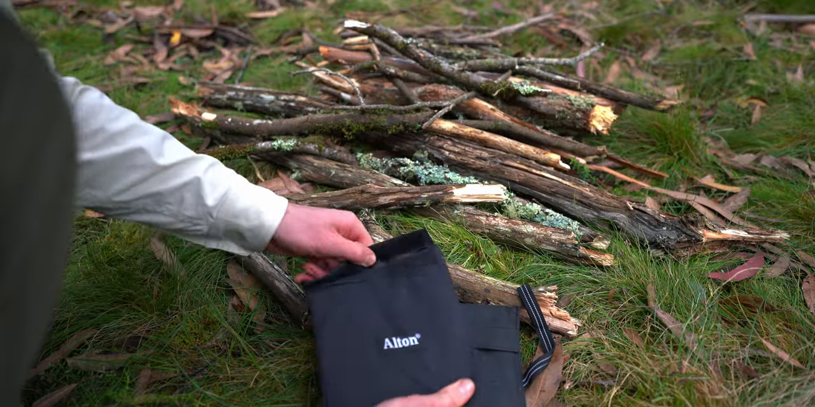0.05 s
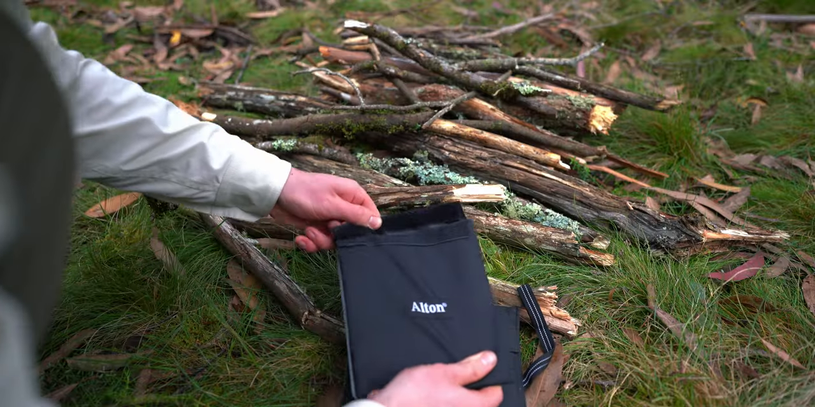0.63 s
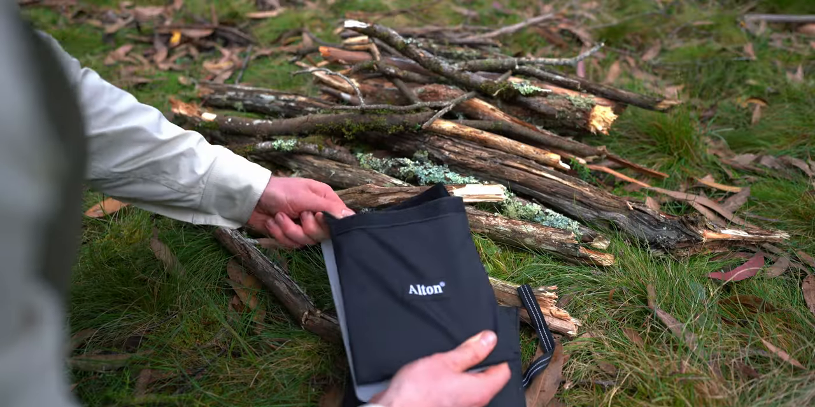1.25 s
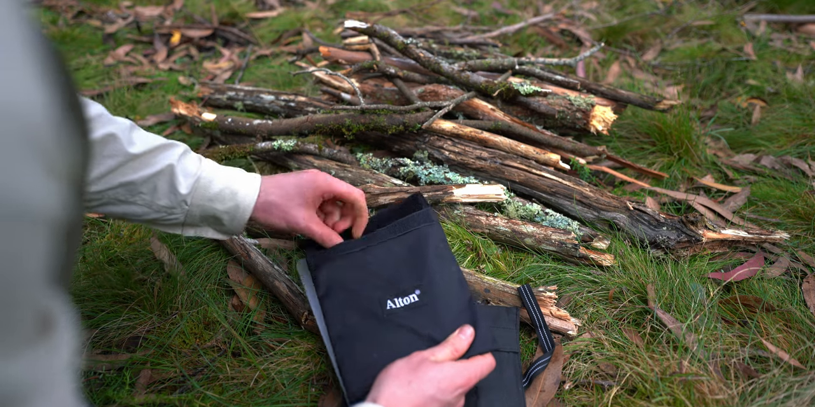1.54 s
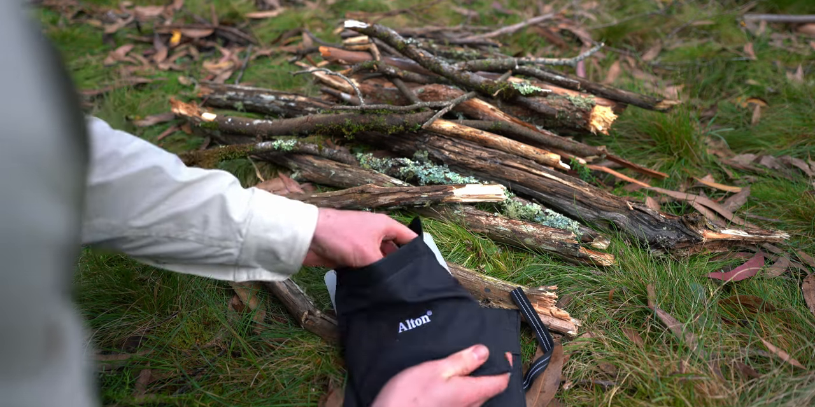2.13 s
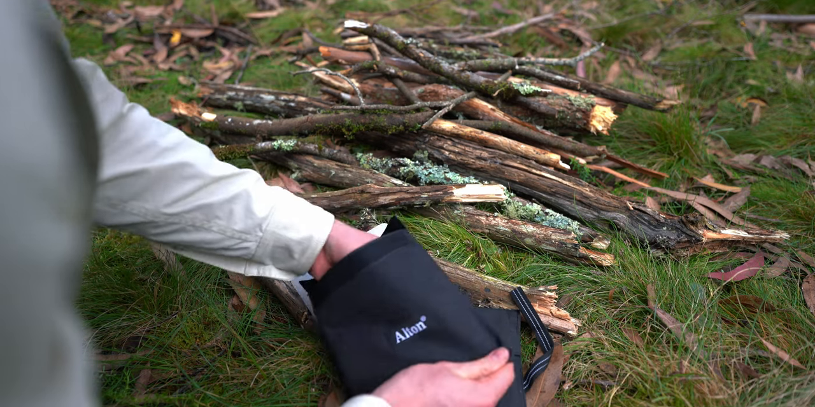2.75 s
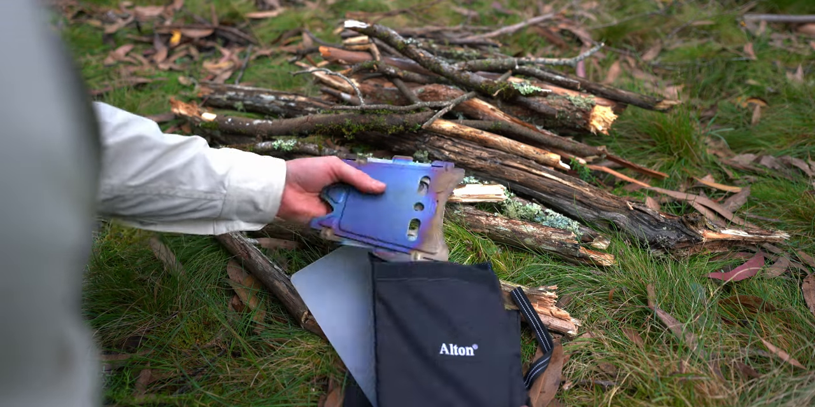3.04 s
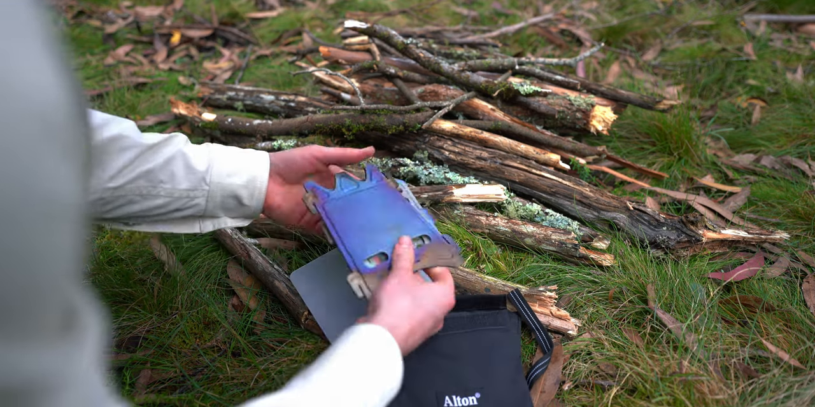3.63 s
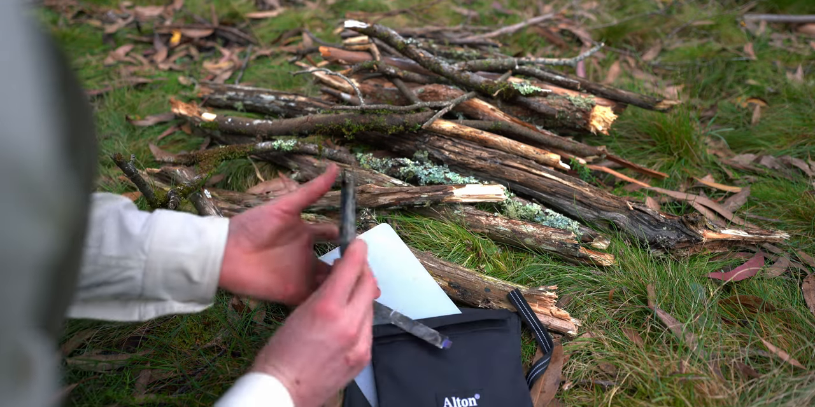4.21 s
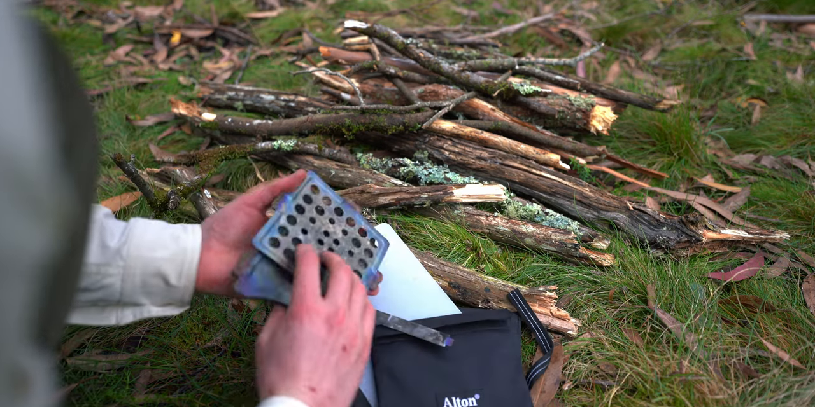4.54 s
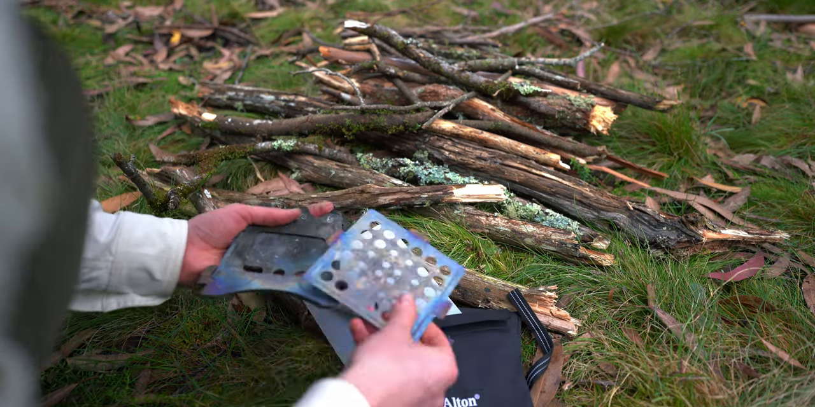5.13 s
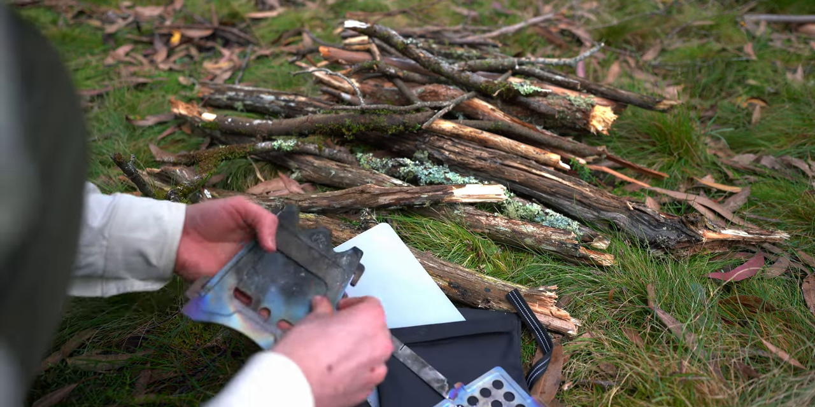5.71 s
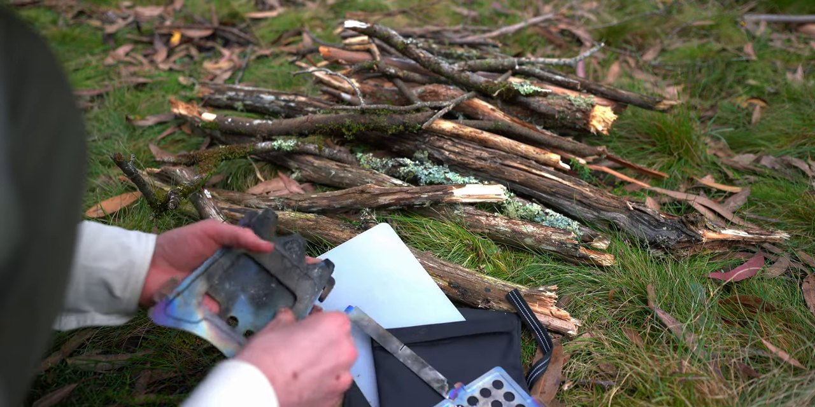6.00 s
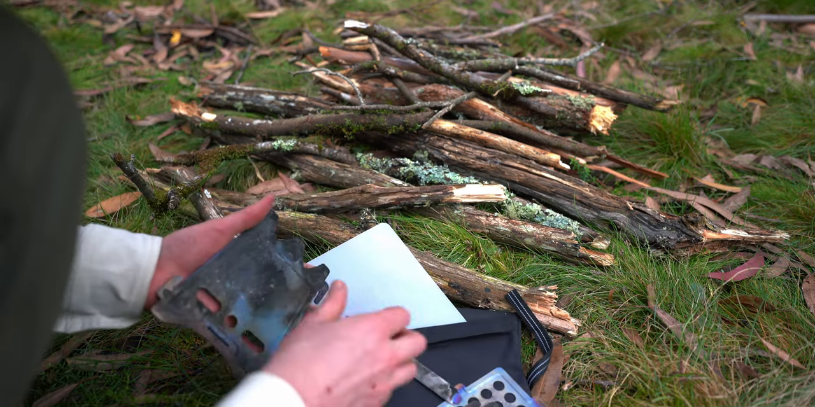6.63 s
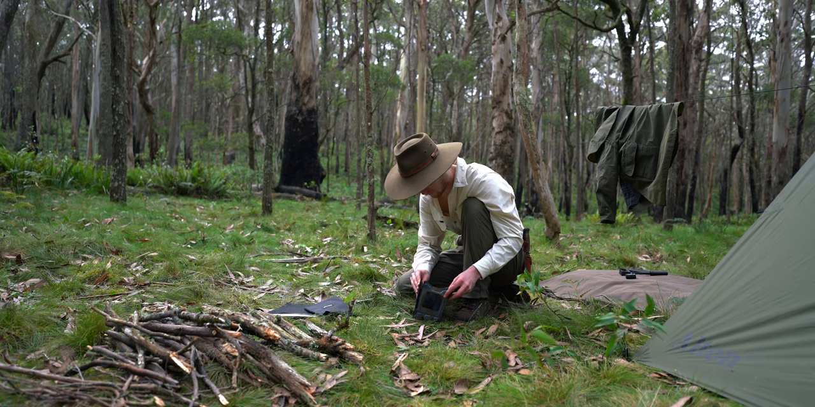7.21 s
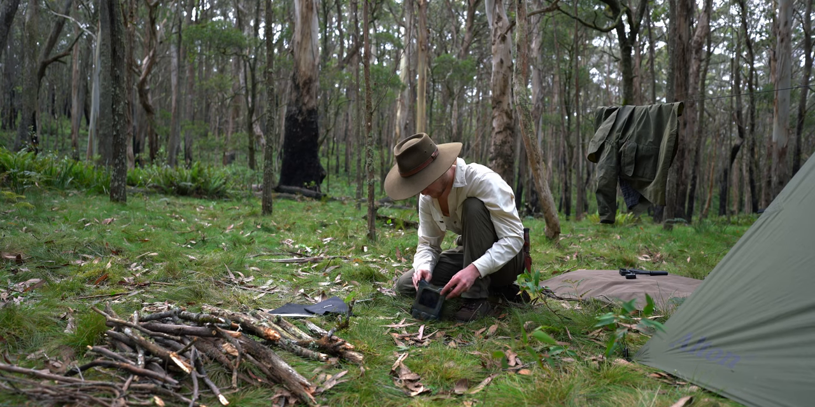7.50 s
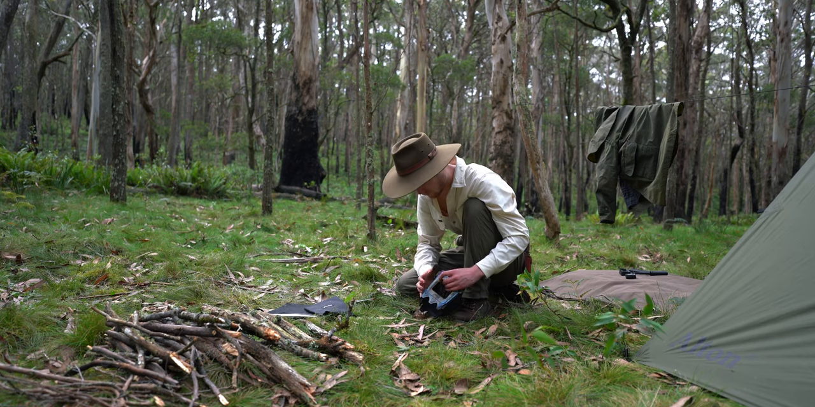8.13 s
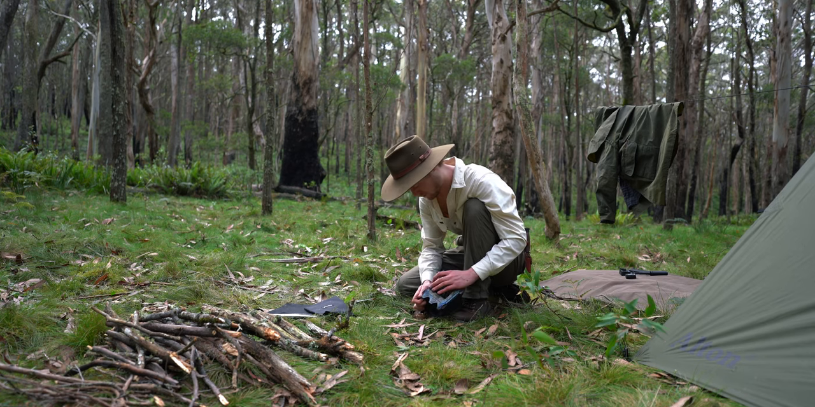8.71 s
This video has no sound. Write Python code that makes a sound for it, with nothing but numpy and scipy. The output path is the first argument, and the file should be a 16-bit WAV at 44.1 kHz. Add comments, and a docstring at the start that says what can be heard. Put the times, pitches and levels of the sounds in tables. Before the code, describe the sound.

Close by, a hook-and-loop fastener peels open in short rips and single snaps over the first 1.5 seconds. From about 1.7 seconds the cloth pouch rustles, snags and crunches as a folded steel stove is tugged out, ending with a faint low bump near 3.2 seconds. Thin plates then scrape and clink brightly from 3.4 seconds, with a brief chattering rattle just after 4. More sliding and sharp clinks follow, and a grate is set down with a short ring at about 5.4 seconds. Hinges rub around 6 seconds, and the walls open with several ringing clacks near 6.5. From 7.4 seconds until about 9, slightly farther off, the metal box is knocked together in short, uneven, hollow clanks, loudest near 7.6, over a soft shuffle of sleeves and grass. Faint forest air and a few low, soft gusts of wind lie underneath.

```python
"""On a forest floor, a hook-and-loop pouch rips open, hook by snapping hook, and a flat-packed steel stove
slides out of the rustling cloth. Its thin plates scrape, clink and chatter in the hands, the grate is set
down ringing, and the walls swing open on rubbing hinges. Then, a little farther off, the box is knocked
together in short, hollow clanks. Faint forest air and a few soft gusts of wind lie under it all."""
import sys
import numpy as np
from scipy import signal
from scipy.fft import rfft, irfft, next_fast_len
from scipy.io import wavfile
from scipy.ndimage import uniform_filter1d

SR = 44100
rng = np.random.default_rng(int(sys.argv[2]) if len(sys.argv) > 2 else 0)


def transcribe(signal):
    """Save signal, clipped to [-1, 1], as a 16-bit WAV file at the path in sys.argv[1]."""
    frames = np.atleast_2d(signal).T
    limited = np.clip(frames, -1, 1)
    pcm = np.round(limited * 32767).astype(np.int16)
    wavfile.write(sys.argv[1], SR, pcm)


N = 390726
TIME = np.arange(N) / SR
RING_TIME = TIME[:SR // 2]  # the half second given to each hit

# Levels in the tables are relative; each layer adds its own gain.
# Low gusts of wind. Each row: start in seconds, length in seconds, level in dB.
GUSTS = [(.14, 0.079, -36), (.65, .38, -51.5), (6.1, 0.525, -54), (8.46, 0.015, -37.5)]
# The fastener peeling. Each row: start in seconds, length in seconds, level in dB.
RIPS = [(.003, 0.021, -28.5), (.539, 0.097, -20.5), (.65, .018, -20.5), (1.052, 0.032, -38.5),
        (1.15, 0.08, -25)]
# Single hooks letting go. Each row: start in seconds, level in dB.
HOOK_SNAPS = [(.01, -9.5), (.033, -7.5), (0.054, -13), (.071, -11), (.338, -14.5), (0.531, -15), (.68, -20),
              (0.696, -16.5), (1.012, -26.5), (1.114, -14), (1.128, -17), (1.213, -1.5), (1.232, -16),
              (1.563, -23)]
# The envelope of the pouch being handled. Each row: time in seconds, level in dB.
HANDLING = [(0, -53.5), (1.55, -60.5), (1.82, -45.5), (2.04, -44.5), (2.095, -35), (2.15, -41),
            (2.22, -44.5), (2.4, -35), (2.74, -44), (2.86, -32.5), (3.0, -54), (3.4, -68)]
# Cloth pulled over steel. Each row: start in seconds, length in seconds, level in dB.
TUGS = [(.2, 0.15, -43), (.81, 0.11, -44), (1.22, 0.055, -42.5), (1.39, 0.046, -42.5),
        (1.745, 0.041, -38.5), (1.89, 0.079, -36.5), (2.06, 0.04, -34.5), (2.145, 0.041, -35),
        (2.29, 0.28, -37.5), (2.8, 0.087, -30), (2.9, 0.058, -29), (3.02, 0.058, -36), (3.19, 0.075, -40.5)]
# Cloth snagging on a plate's corner. Each row: time of the peak in seconds, level in dB.
SNAGS = [(.832, -37), (1.813, -26), (2.18, -30), (2.274, -23.5), (2.357, -20.5)]
# Stiff folds buckling. Each row: time of the peak in seconds, level in dB.
CRUMPLES = [(.832, -34), (1.43, -43), (1.8, -30), (1.878, -38.5), (2.097, -27)]
# Plate sliding over plate, and the long, faint rows are fingers rubbing along the steel. Each row: start in
# seconds, length in seconds, level in dB.
SLIDES = [(3.36, 0.033, -32), (3.56, 0.11, -31.5), (3.67, 0.68, -50), (4.343, 0.031, -33),
          (4.37, 0.4, -43.5), (4.405, 0.078, -31), (4.547, 0.019, -31.5), (4.608, .075, -31),
          (4.7, .05, -35.5), (4.82, 0.11, -33), (4.86, 0.06, -22.5), (5.088, 0.018, -22.5),
          (5.115, 0.027, -26.5), (5.38, .04, -25.5), (5.68, 0.74, -52)]
# A sliding edge biting for an instant. Each row: time of the peak in seconds, level in dB.
CATCHES = [(3.574, -19), (3.872, -19.5), (4.632, -19.5), (4.674, -21.5), (4.966, -19), (5.157, -19),
           (5.657, -26.5)]
# Steel striking steel in the hands. Each row: start in seconds, level in dB,
# offset of the dull knock in dB, the clash's 60 dB decay time (t60) in seconds, part struck.
CLINKS = [(3.571, -21, -13, 0.085, "pack"), (3.822, -30.5, 4, .04, "pack"),
          (3.829, -12.5, -18, 0.05, "pack"), (3.864, -5, -37, 0.017, "pack"),
          (4.002, -24, -2.5, .06, "pack"), (4.043, -21, -6, 0.16, "pack"),
          (4.077, -24.5, -5.5, 0.065, "pack"), (4.367, -16, -28.5, .015, "pack"),
          (4.84, -10.5, -31, 0.065, "grate"), (4.952, -6.5, -34, .06, "grate"),
          (5.06, -20, -37, 0.051, "grate"), (5.169, -14.5, -47, 0.016, "grate"),
          (5.347, -9, -17.5, 0.13, "grate"), (5.356, -12, -14.5, 0.25, "grate"),
          (5.41, -19, -9.5, .067, "grate"), (5.558, -20.5, -22.5, 0.17, "grate"),
          (5.651, -29.5, -19, 0.18, "grate"), (6.186, -29.5, -33, 0.051, "hinge"),
          (6.406, -7.5, -12.5, 0.062, "wall"), (6.449, -8, -22, 0.061, "wall"),
          (6.561, -11.5, -21, 0.26, "wall"), (6.591, -10, -30, 0.28, "wall"),
          (6.98, -33.5, -18.5, 0.085, "wall")]
# Hinges rubbing as the walls unfold. Each row: start in seconds, length in seconds, level in dB.
SWINGS = [(5.953, 0.031, -36.5), (6.01, 0.024, -35.5), (6.095, 0.059, -27.5), (6.175, 0.02, -31),
          (6.52, 0.031, -38)]
# Knocks on the box, whose note changes with the grip. Each row: start in seconds, level in dB, note in Hz.
BOX_HITS = [(7.375, -24, 410), (7.39, -9.5, 421), (7.523, -21.5, 330), (7.615, -2, 296.7),
            (7.648, -17, 279.5), (7.776, -26.5, 403), (7.901, -7.5, 305), (7.924, -13, 297),
            (8.05, -26, 312), (8.175, -14, 291), (8.209, -19.5, 338), (8.299, -24.5, 316),
            (8.376, -20.5, 336), (8.49, -27, 375), (8.573, -25, 412), (8.726, -27, 305),
            (8.838, -14.5, 390)]

# The ringing modes of each steel part. Each row: frequency in Hz, level in dB, t60 in seconds.
PACK_MODES = [(2490, -7, .15), (3278, -20, .6), (4270, -6, .17), (5400, -11, .45), (6395, -14, .65),
              (10170, -6, .22), (11700, -10, .35), (12400, -3, .23), (13020, -2, .33), (13850, 1, .2),
              (14870, -3, .25)]
GRATE_MODES = [(1437, -21, .42), (4200, -8, .2), (4990, -5, .13), (6699, 0, .18), (8295, 0, .11),
               (9038, 3, .2), (9945, 3, .14), (10733, 2, .15), (11185, 3, .12), (12348, 1, .17),
               (12960, -4, .3), (13516, 3, .14), (14200, 2, .13), (14717, 1, .13)]
HINGE_MODES = [(2702, -13, .26), (4441, 2, .23), (11050, -8, .2)]
WALL_MODES = [(404, -11, .15), (683, -6, .2), (1384, -7, .18), (1444, -5, .33), (1653, -11, .24),
              (2072, -1, .2), (3330, 2, .21), (3439, 1, .17), (4003, 1, .19), (4452, -1, .22),
              (5740, -1, .18), (6437, -6, .36), (6676, -1, .22), (7200, -2, .15), (7405, 6, .17),
              (7741, -2, .15), (8510, -2, .14), (11480, -5, .18), (12560, -1, .14), (13600, 1, .13)]
BOX_MODES = [(1413, -7, 0.15), (1870, -4, 0.15), (2344, 2, 0.093), (3480, 5.5, 0.073), (4010, 4.5, 0.046),
             (6540, 6.5, 0.03)]
# The hollow of the box. Each row: multiple of its note, level in dB, t60 in seconds.
BOX_HOLLOW = [(1, 2, 0.18), (1.44, -2, 0.15), (2.03, -5.5, .12), (3.1, -2, .13)]

# EQ curves of the background and the cloth. Each row: frequency in Hz, gain in dB.
AIR_EQ = [(25, -12), (70, -2), (170, -13), (450, -8), (1500, -18), (16000, -22)]
WIND_EQ = [(40, 0.5), (85, -9), (130, -27), (1000, -90)]
SHUFFLE_EQ = [(60, 9.5), (380, 1.5), (800, -3.5), (16000, -8.5)]
HOOK_EQ = [(120, -24.5), (300, -15), (560, 0), (1000, -2.5), (1500, 3), (2300, -5.5), (2800, 0), (3500, -6),
           (4200, -1), (5200, -5), (8500, -6.5), (14000, -5.5), (16000, -8.5)]
POUCH_HOLLOW_EQ = [(100, -29), (300, -15.5), (620, 0), (930, 1.5), (2400, -13.5), (5000, -38)]
WEAVE_EQ = [(100, -22.5), (400, -3.5), (900, 4.5), (2000, -3.5), (4200, -0.5), (16000, -4)]
CRUMPLE_EQ = [(150, -32), (560, 5.5), (1400, 0), (2200, -13), (16000, -28)]
# EQ curves of rubbed and struck steel. Each row: frequency in Hz, gain in dB.
SLIDE_EQ = [(150, -48), (450, -16.5), (850, -24.5), (4300, -2), (8000, -0.5), (16000, -4)]
PACK_EQ = [(300, -30), (3000, -26), (4500, -4), (10000, 0.5), (12800, 7), (16000, -22)]
CHATTER_EQ = [(200, -35), (550, 4.5), (2700, -0.5), (3600, -9), (16000, -17)]
GRATE_EQ = [(300, -34), (1900, -13.5), (3000, -9.5), (4300, -5.5), (5800, -11.5), (7500, -2.5),
            (11500, -0.5), (16000, -2)]
HINGE_EQ = [(300, -21), (1700, -24), (2700, -4), (3400, 4), (5800, -1), (7200, 3.5), (12000, 0),
            (16000, -3)]
WALL_EQ = [(200, -14), (1500, -4.5), (2700, -6.5), (3600, -1.5), (4600, -1), (7000, -1), (10000, 0),
           (14000, 1), (16000, -5)]
BOX_EQ = [(150, -30), (300, -11), (1400, -9.5), (2300, -1), (2950, -6), (3700, -2.5), (6000, -6.5),
          (16000, -6)]
# EQ curves of the dull knock, for the stacked pack and other parts. Each row: frequency in Hz, gain in dB.
PACK_KNOCK_EQ = [(100, -29), (650, 2.5), (1070, -0.5), (1400, -14.5), (1880, -3.5), (3200, -14.5),
                 (4400, -6), (16000, -49)]
KNOCK_EQ = [(80, -25), (250, -14.5), (500, -2), (900, -14), (1400, -13), (1900, -6), (3000, -31),
            (8000, -46)]


def amp(db):
    """Decibels to gain."""
    return 10 ** (np.asarray(db) / 20)


def unit(x):
    """Scale to rms 1."""
    return x / np.sqrt(np.mean(x ** 2) + 1e-20)


def fade(t60):
    """A decay of 60 dB in t60 seconds."""
    return np.exp(-np.log(1000) * RING_TIME / t60)


def add(track, start, sound):
    """Mix a sound into a track at start seconds."""
    span = track[max(0, round(start * SR)):][:len(sound)]
    span += sound[:len(span)]


def wobble(rate):
    """A random curve gliding to a new value rate times a second."""
    knots = rng.standard_normal(int(N * rate / SR) + 4)
    return np.interp(TIME * rate, np.arange(len(knots)), knots)


def coloured(x, eq, ragged_db=0, points=400):
    """Shape x with an EQ curve, roughened by random peaks and dips, to rms 1."""
    size = next_fast_len(len(x) + 8192)
    hz = np.fft.rfftfreq(size, 1 / SR)
    eq_hz, eq_db = np.transpose(eq)
    ripple = np.interp(hz, np.linspace(0, SR / 2, points), rng.standard_normal(points))
    gain = amp(np.interp(np.log(hz + 1), np.log(eq_hz), eq_db) + ragged_db * ripple)
    return unit(irfft(rfft(x, size) * gain, size)[:len(x)])


def noise(eq, ragged_db=0):
    """Coloured noise of rms 1."""
    return coloured(rng.standard_normal(N), eq, ragged_db)


def friction(rate, grit_db):
    """White noise broken into tiny catches, rate of them a second."""
    return unit(rng.standard_normal(N) * amp(grit_db * np.tanh(wobble(rate) / 2) * 1.97))


def shifting(x, depth_db):
    """Resonances come and go as the point of contact moves."""
    spectra = signal.stft(x, nperseg=512)[2]
    drift = uniform_filter1d(rng.standard_normal(spectra.shape), 3, axis=0)  # smooth over frequency
    drift = unit(uniform_filter1d(drift, 6, axis=1))  # and over time
    return unit(signal.istft(spectra * amp(depth_db * drift), nperseg=512)[1][:N])


def strokes(rows, attack_s, release_s, arch_db=0):
    """Envelopes that set in, hold and die away; arch_db lifts or dips the middle of each."""
    power = np.zeros(N)
    for start, length, db in rows:
        span = slice(int(start * SR), int((start + length) * SR) + SR // 2)
        t = TIME[span] - start
        gate = (1 - np.exp(-(t / attack_s) ** 2)) * np.exp(-np.maximum(t - length, 0) / release_s)
        arch = np.sin(np.pi * np.clip(t / length, 0, 1))
        power[span] += (gate * amp(db + arch_db * (arch - .5))) ** 2
    return np.sqrt(power)


def surges(rows, rise_s, fall_s):
    """Brief bell-shaped swells of force."""
    force = np.zeros(N)
    t = RING_TIME - RING_TIME.mean()
    bell = np.exp(-(t / np.where(t < 0, rise_s, fall_s)) ** 2 / 2)
    for peak_s, db in rows:
        add(force, peak_s + t[0], amp(db) * bell)
    return force


def ring(modes, scatter_db=2):
    """A part's modes, at new strengths for each touch, starting near rms 1."""
    waves = np.zeros(len(RING_TIME))
    for hz, db, t60 in modes:
        scatter, phase = rng.standard_normal(2)
        waves += amp(db + scatter_db * scatter) * fade(t60) * np.sin(2 * np.pi * (hz * RING_TIME + phase))
    return waves / np.sqrt(sum(amp(db) ** 2 for _, db, _ in modes) / 2)


def crowded_modes(eq, ragged_db, points=260):
    """Plate modes so dense that they blur into noise, new for every spot struck."""
    return coloured(rng.standard_normal(len(RING_TIME)), eq, ragged_db, points)


def forest_air():
    """A bed of still air with soft, low buffets of wind."""
    wind = strokes(GUSTS, attack_s=0.0087, release_s=0.049, arch_db=-5) * noise(WIND_EQ)
    return amp(-61) * noise(AIR_EQ) + wind


def fastener(rip_snaps_per_s=800, stray_snaps_per_s=33, snap_t60=0.0076):
    """Hooks snap one by one, hundreds a second in a rip, each flicking the taut cloth."""
    def flicks(per_s, gate=1):
        snaps = gate * (rng.random(N) < per_s / SR)
        sizes = amp(4 * np.clip(rng.standard_normal(N), -2, 2))
        power = signal.fftconvolve((snaps * sizes) ** 2, fade(snap_t60) ** 2)[:N]
        return np.sqrt(np.abs(power))

    peel = strokes(RIPS, attack_s=0.00075, release_s=0.0081, arch_db=4)
    force = amp(-1) * unit(flicks(rip_snaps_per_s)) * peel
    strained = (TIME > .15) & (TIME < 1.5)  # a few hooks also give way between rips
    force += amp(-36) * flicks(stray_snaps_per_s, strained)
    for start, db in HOOK_SNAPS:
        add(force, start, amp(db - 7) * fade(snap_t60))
    crackle = force * rng.standard_normal(N)
    return coloured(crackle, HOOK_EQ, ragged_db=2.5) * np.std(crackle)


def pouch(open_pitch=0.99, filled_pitch=1.17):
    """The weave rustles when held and hisses when tugged; the hollow rises in pitch as the hand fills it."""
    def hollow(pitch):
        return coloured(friction(150, grit_db=3), np.array(POUCH_HOLLOW_EQ) * [pitch, 1], ragged_db=2)

    filled = np.interp(TIME, [2.1, 2.75], [0, 1])
    cavity = np.sqrt(1 - filled) * hollow(open_pitch) + np.sqrt(filled) * hollow(filled_pitch)
    cavity = shifting(cavity, depth_db=6.5)
    weave = coloured(friction(900, grit_db=3.5), WEAVE_EQ, ragged_db=1) * amp(2.27 * wobble(120))
    handling = amp(np.interp(TIME, *np.transpose(HANDLING), right=-120))
    rustle = amp(-53) * unit(np.sqrt(handling))
    pull = strokes(TUGS, attack_s=0.0069, release_s=0.022) + surges(SNAGS, rise_s=0.0049, fall_s=0.0064)
    return handling * cavity + np.hypot(rustle, amp(-2) * pull) * weave


def crumples():
    """A buckling fold gives a short, gritty, hollow crunch."""
    crunch = coloured(friction(500, grit_db=3.5), CRUMPLE_EQ)
    return surges(CRUMPLES, rise_s=0.0033, fall_s=0.0071) * crunch


def thud(peak_s=3.17, hz=86, db=-44.5):
    """The soft, low bump of the pouch settling on a log."""
    bump = surges([(peak_s, db)], rise_s=0.025, fall_s=0.042)
    return bump * np.sin(2 * np.pi * hz * TIME + wobble(25))


def scrape(force, eq, modes, grit_db, ring_db, ragged_db):
    """Steel catches on steel; the catches keep the part's modes ringing."""
    grit = coloured(friction(700, grit_db), eq, ragged_db)
    rub = force * shifting(grit, depth_db=3) * amp(2.5 * wobble(140))
    body = ring(modes)
    return rub + amp(ring_db) * signal.fftconvolve(rub, body / np.linalg.norm(body))[:N]


def plate_slides():
    """Plates scrape over each other, an edge biting now and then, while fingers rub faintly along the steel."""
    sliding = strokes(SLIDES, attack_s=0.003, release_s=0.012, arch_db=4)
    force = np.hypot(sliding, surges(CATCHES, rise_s=0.0022, fall_s=0.007))
    return amp(-1.5) * scrape(force, SLIDE_EQ, GRATE_MODES, grit_db=2.5, ring_db=-32, ragged_db=1)


def shimmer(t60, partials=70):
    """The many upper partials of a thin plate, starting at rms 1."""
    spread, phase = rng.random((partials, 2)).T[..., None]
    hz = 3000 + 12000 * spread
    return unit(np.sin(2 * np.pi * (hz * RING_TIME + phase)).sum(axis=0)) * fade(t60)


def clinks(part, modes, eq, knock_eq, clash_db, ring_db, knock_db, knock_t60, shimmer_db, shimmer_t60):
    """Each blow lands on a new spot: a crack and clash, a dull knock, and modes that ring on."""
    track = np.zeros(N)
    sheen = amp(shimmer_db) * shimmer(shimmer_t60)
    crack = amp(-21) * fade(0.0036)  # the first instant of contact
    for start, db, dull_db, clash_t60, struck in CLINKS:
        if struck == part:
            clash = amp(clash_db) * crowded_modes(eq, ragged_db=6) * (fade(clash_t60) + crack)
            knock = amp(dull_db + knock_db) * crowded_modes(knock_eq, ragged_db=5) * fade(knock_t60)
            tail = clash_t60 * (amp(ring_db) * ring(modes) + sheen)  # a longer clash rings louder
            add(track, start, amp(db) * (clash + knock + tail))
    return track


def chatter(start=4.08, length=0.3, db=-39, sag_db_per_s=26, bounce_t60=0.045):
    """A loose plate bounces on the pack ever faster and more softly."""
    t = np.clip(TIME - start, 0, 2 * length)
    bounces_per_s = (85 + 220 * t) * np.exp(.25 * wobble(80))
    bounces = np.diff(np.floor(np.cumsum(bounces_per_s) / SR), prepend=0)
    rattle = unit(signal.fftconvolve(bounces, fade(bounce_t60))[:N])
    force = strokes([(start, length, db)], attack_s=0.0078, release_s=0.054) * amp(-sag_db_per_s * t)
    return force * rattle * noise(CHATTER_EQ, ragged_db=2)


def hinge_swings():
    """The hinges rub and ring as the walls unfold."""
    force = strokes(SWINGS, attack_s=0.0031, release_s=0.0095, arch_db=2.5)
    return scrape(force, HINGE_EQ, HINGE_MODES, grit_db=2, ring_db=-12.5, ragged_db=2)


def shuffle(start=6.93, rise_s=0.85, db=-48):
    """Sleeves and grass stir round the box."""
    fade_in = np.clip((TIME - start) / rise_s, 0, 1)
    return amp(db) * fade_in * coloured(friction(60, grit_db=4.5), SHUFFLE_EQ, ragged_db=1.5)


def box_knocks(clash_t60=0.083, detune=0.0264, attack_s=0.0013):
    """A clank over a hollow note, short because the joined walls damp each other."""
    track = np.zeros(N)
    onset = 1 - np.exp(-RING_TIME / attack_s)
    for start, db, note_hz in BOX_HITS:
        clash = amp(-9) * crowded_modes(BOX_EQ, ragged_db=4, points=400) * fade(clash_t60)
        pitch = 1 + detune * rng.standard_normal()
        walls = amp(-16) * ring(np.array(BOX_MODES) * [pitch, 1, 1])
        # The hollow grows more slowly than the clash, so light blows are duller.
        hollow = amp(-30.5 + 0.81 * db) * ring(np.array(BOX_HOLLOW) * [note_hz, 1, 1])
        add(track, start, (amp(db) * (clash + walls) + hollow) * onset)
    return track


def trees(x, t60, wet_db, cutoff_hz=5000):
    """Ground and trunks scatter a faint, darker tail back."""
    tail = rng.standard_normal(len(RING_TIME)) * fade(t60)
    tail = signal.sosfilt(signal.butter(1, cutoff_hz, fs=SR, output="sos"), tail)
    return x + amp(wet_db) * signal.fftconvolve(x, tail / np.linalg.norm(tail))[:N]


def scene():
    """The mono mix: cloth and plates close and nearly dry, the box wetter, forest air beneath."""
    steel = plate_slides() + hinge_swings()
    steel += clinks("pack", PACK_MODES, PACK_EQ, PACK_KNOCK_EQ, clash_db=-10, ring_db=6.5,
                    knock_db=-1.5, knock_t60=0.054, shimmer_db=-2.5, shimmer_t60=0.18)
    steel += clinks("grate", GRATE_MODES, GRATE_EQ, KNOCK_EQ, clash_db=-6.5, ring_db=4,
                    knock_db=-2, knock_t60=0.13, shimmer_db=-12, shimmer_t60=0.18)
    steel += clinks("hinge", HINGE_MODES, HINGE_EQ, KNOCK_EQ, clash_db=-17, ring_db=22,
                    knock_db=0, knock_t60=.05, shimmer_db=2, shimmer_t60=0.14)
    steel += clinks("wall", WALL_MODES, WALL_EQ, KNOCK_EQ, clash_db=-9, ring_db=4,
                    knock_db=-9, knock_t60=0.11, shimmer_db=-1.5, shimmer_t60=0.15)
    cloth = fastener() + pouch() + crumples() + thud()
    near = trees(cloth + steel + chatter(), t60=.3, wet_db=-33)
    farther = trees(box_knocks(), t60=0.7, wet_db=-23)
    return (near + farther + forest_air() + shuffle())[None]


def record(dry, ceiling=.56, top_hz=15900):
    """Soft-clip the tallest peaks, then cut the very top with a steep low-pass."""
    rounded = dry / (1 + np.abs(dry / ceiling) ** 6) ** (1 / 6)
    size = next_fast_len(N + SR)
    lowpass = 1 / (1 + (np.fft.rfftfreq(size, 1 / SR) / top_hz) ** 200)
    return irfft(rfft(rounded, size) * lowpass, size)[..., :N]


dry = scene()
out = record(dry)
transcribe(out)
```